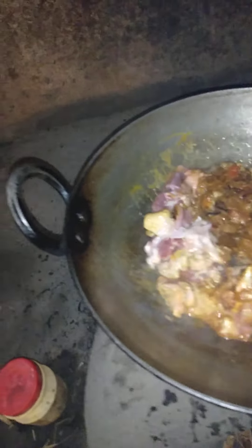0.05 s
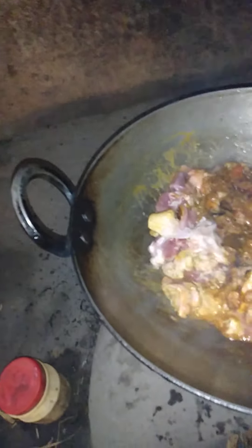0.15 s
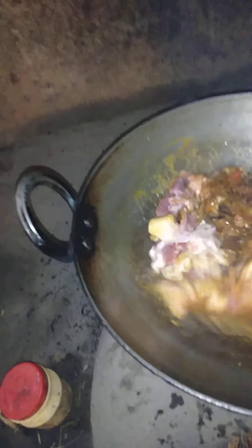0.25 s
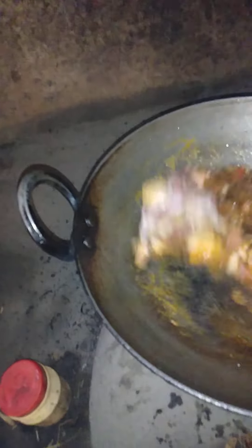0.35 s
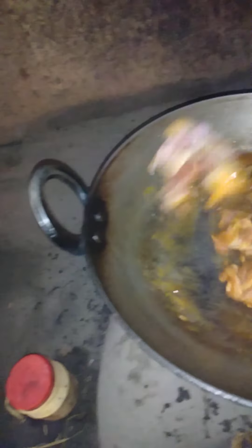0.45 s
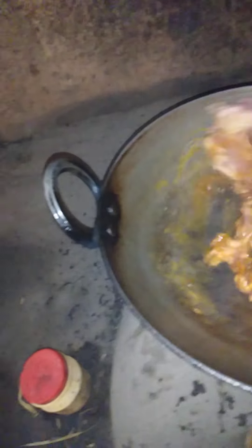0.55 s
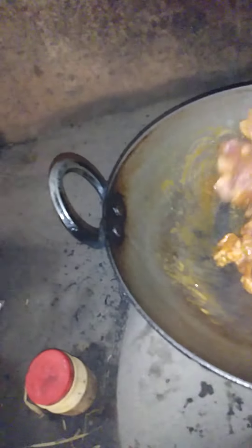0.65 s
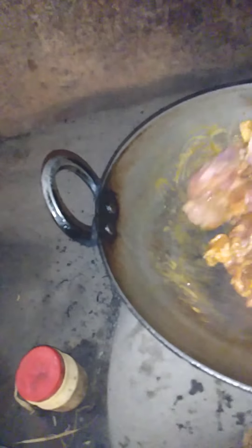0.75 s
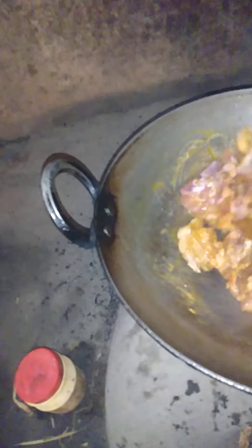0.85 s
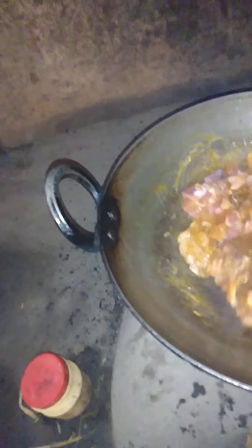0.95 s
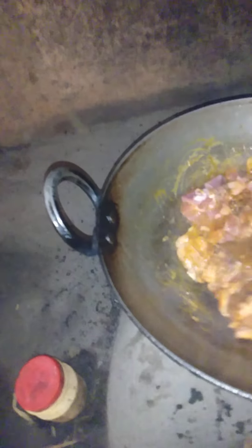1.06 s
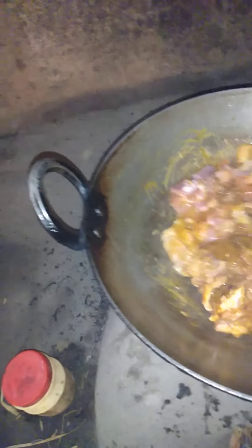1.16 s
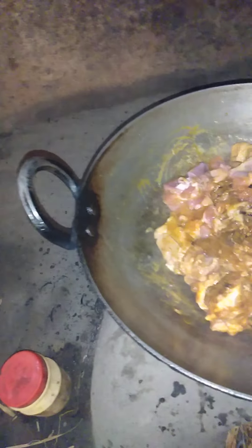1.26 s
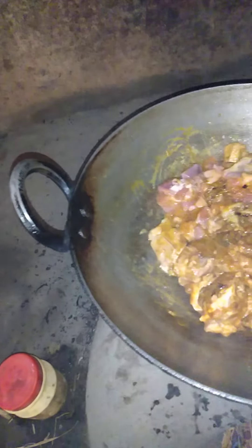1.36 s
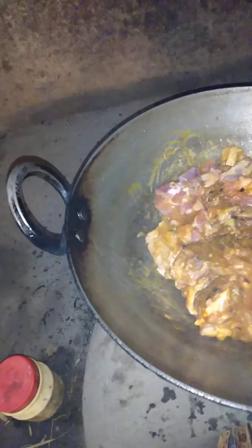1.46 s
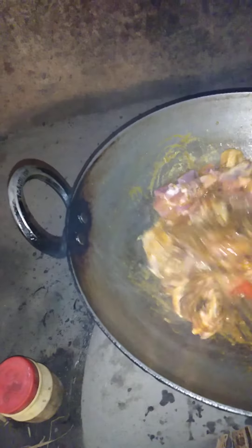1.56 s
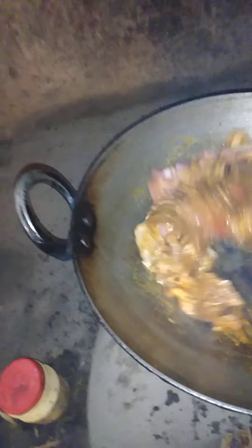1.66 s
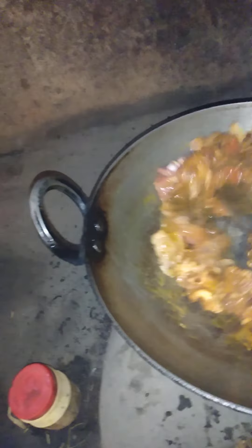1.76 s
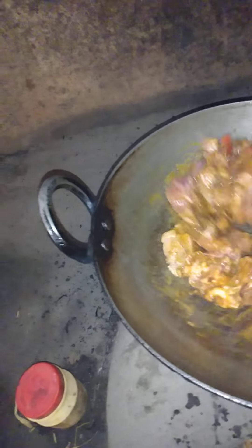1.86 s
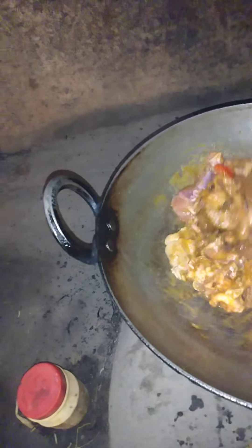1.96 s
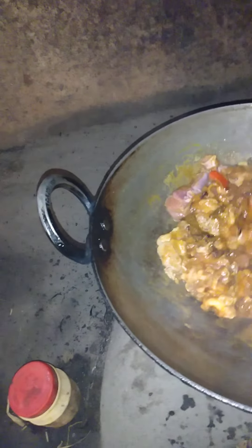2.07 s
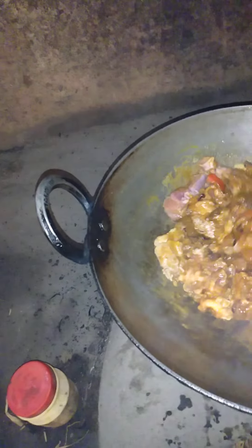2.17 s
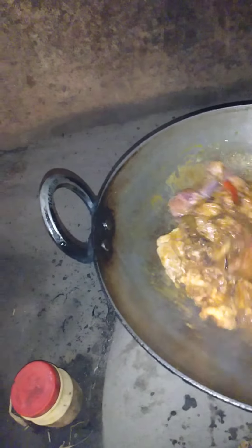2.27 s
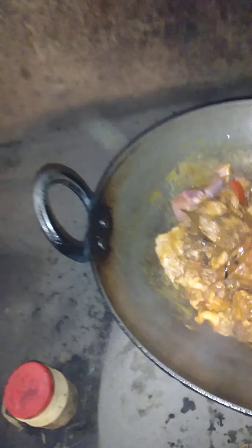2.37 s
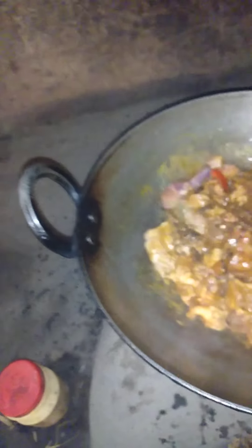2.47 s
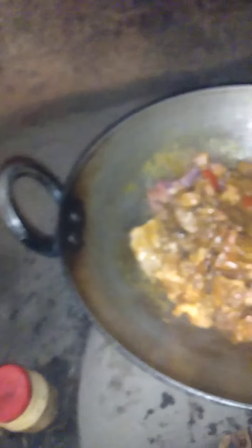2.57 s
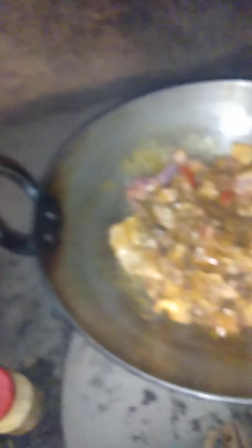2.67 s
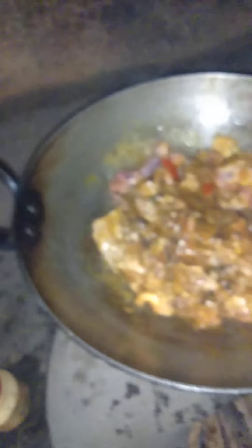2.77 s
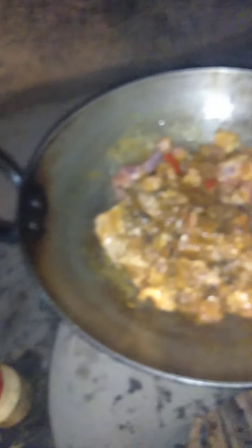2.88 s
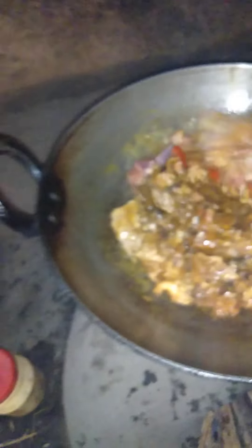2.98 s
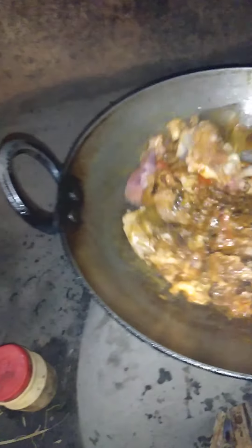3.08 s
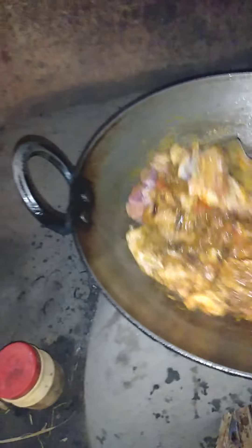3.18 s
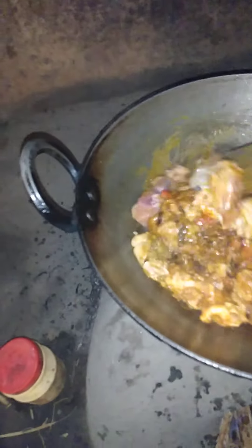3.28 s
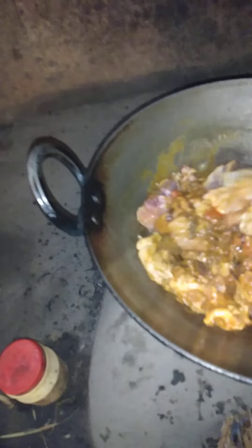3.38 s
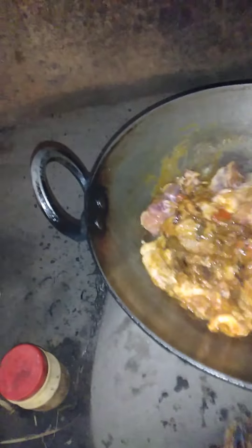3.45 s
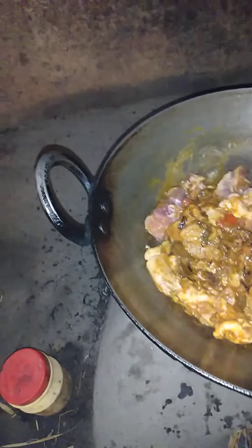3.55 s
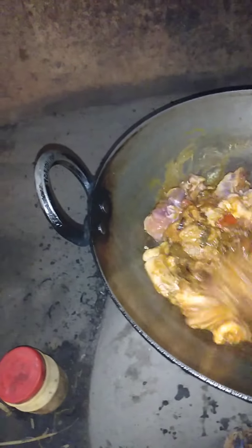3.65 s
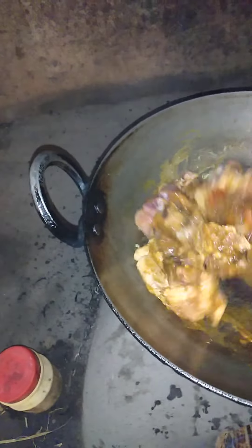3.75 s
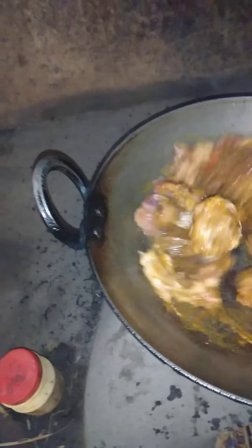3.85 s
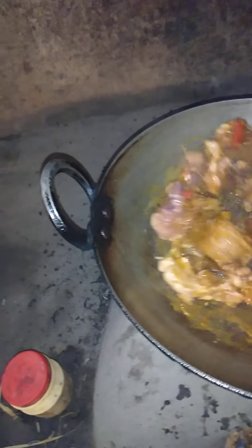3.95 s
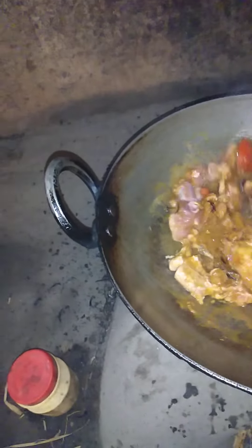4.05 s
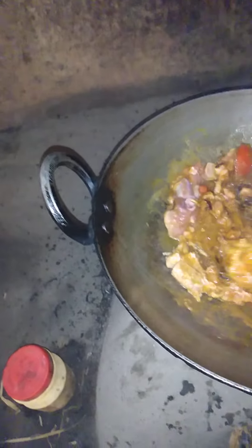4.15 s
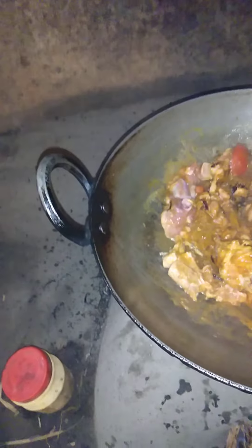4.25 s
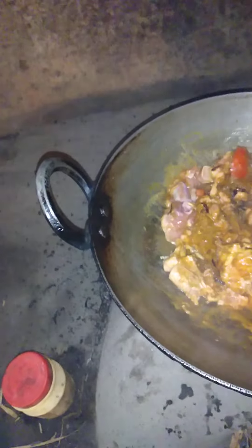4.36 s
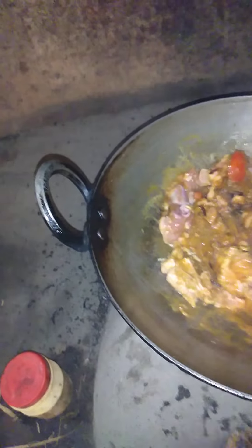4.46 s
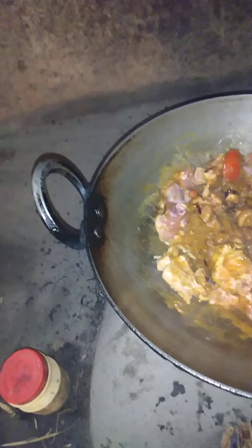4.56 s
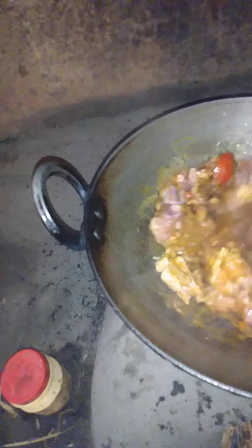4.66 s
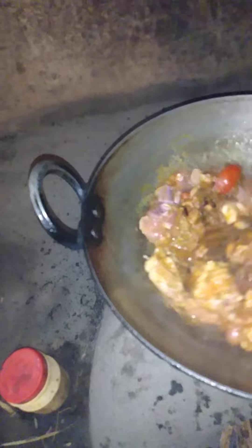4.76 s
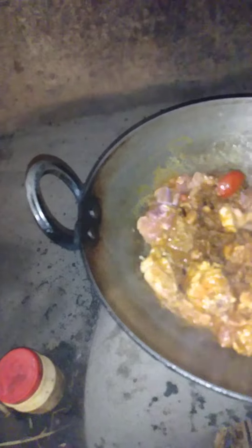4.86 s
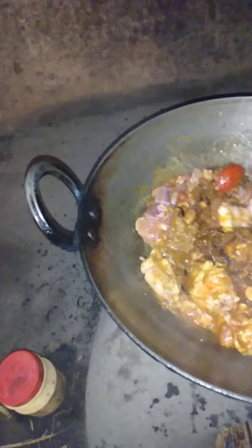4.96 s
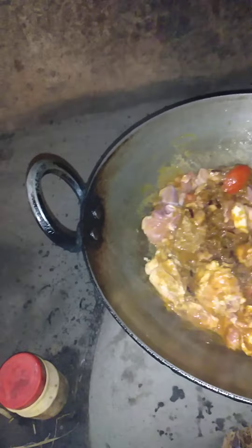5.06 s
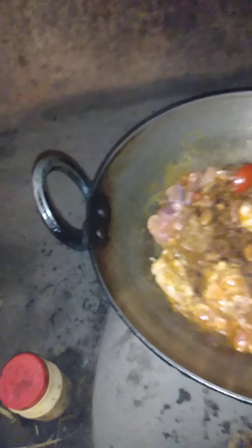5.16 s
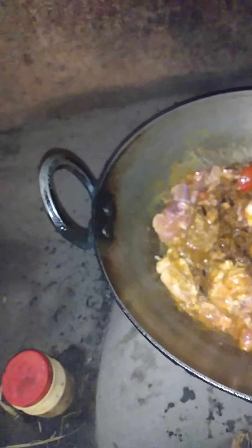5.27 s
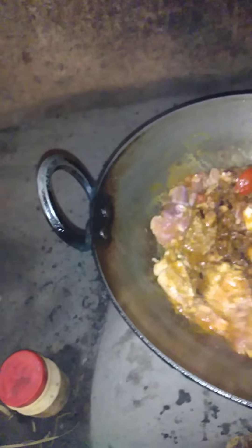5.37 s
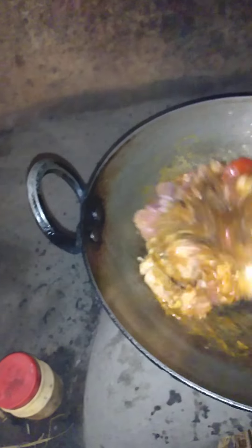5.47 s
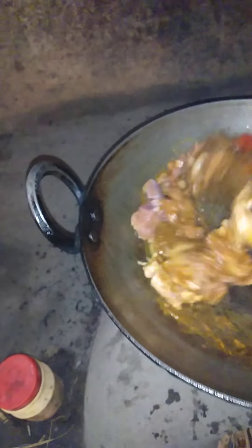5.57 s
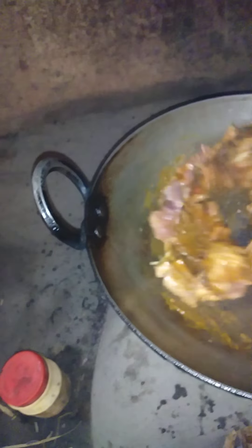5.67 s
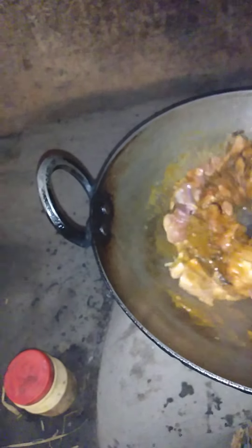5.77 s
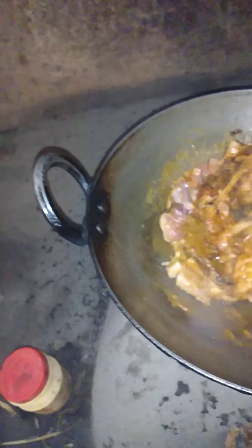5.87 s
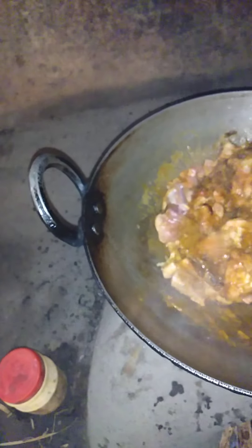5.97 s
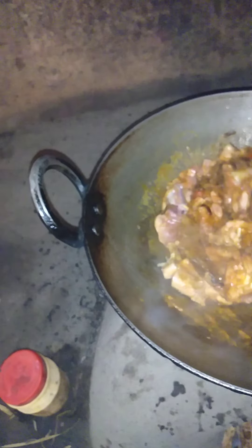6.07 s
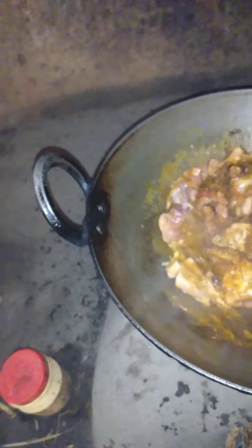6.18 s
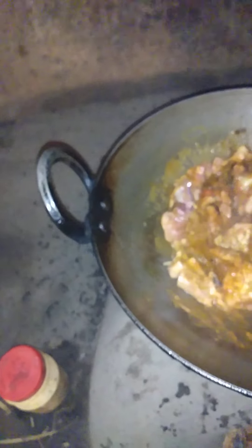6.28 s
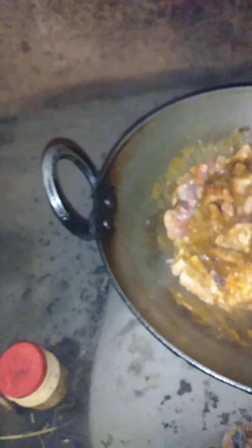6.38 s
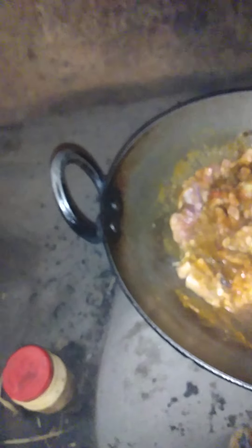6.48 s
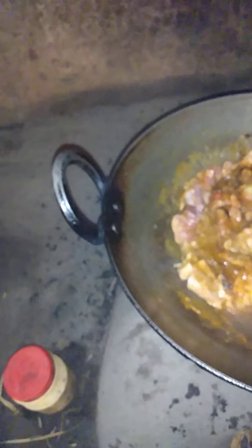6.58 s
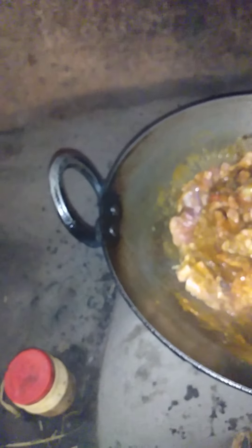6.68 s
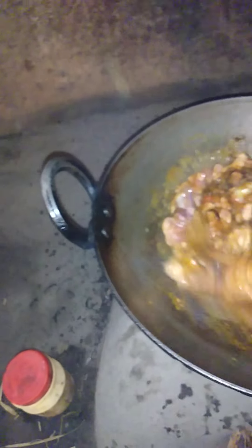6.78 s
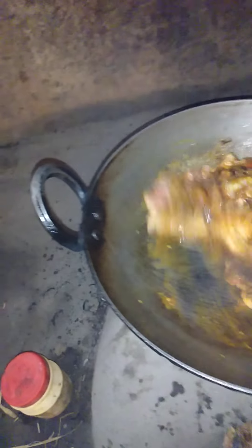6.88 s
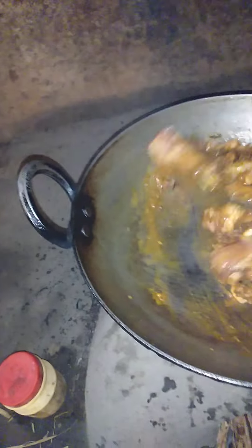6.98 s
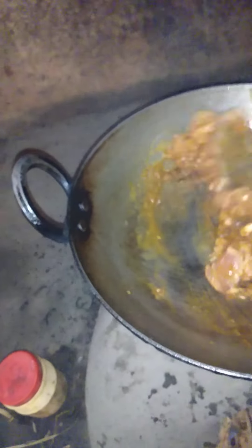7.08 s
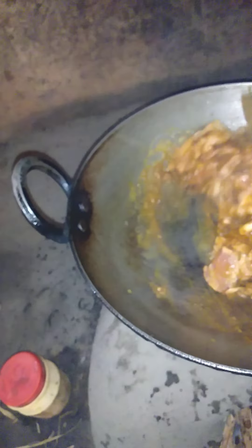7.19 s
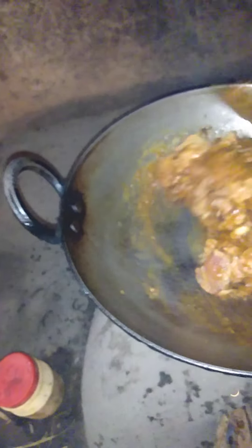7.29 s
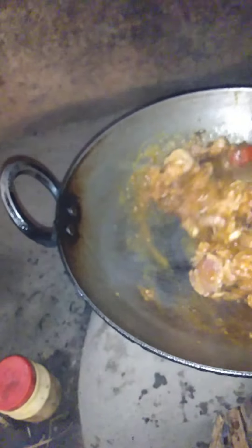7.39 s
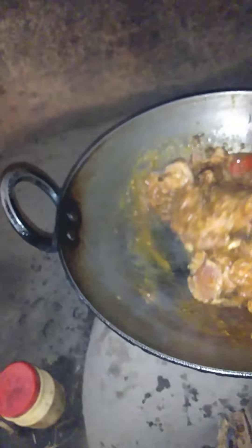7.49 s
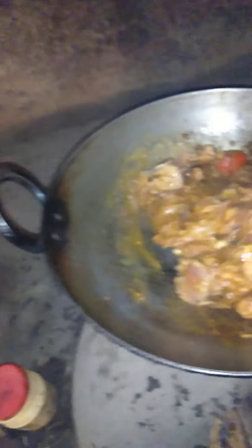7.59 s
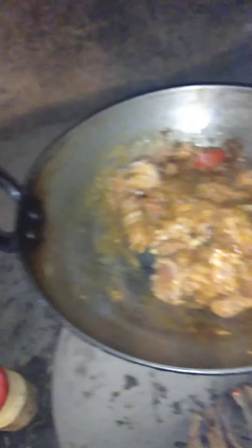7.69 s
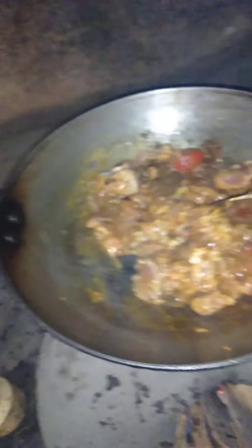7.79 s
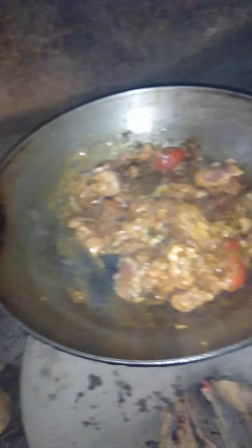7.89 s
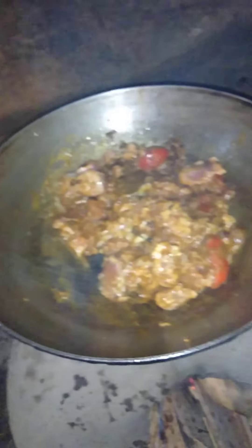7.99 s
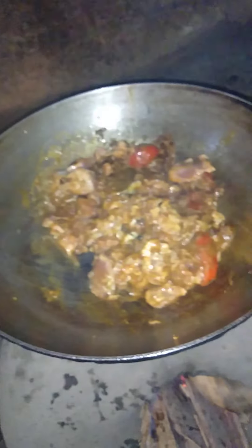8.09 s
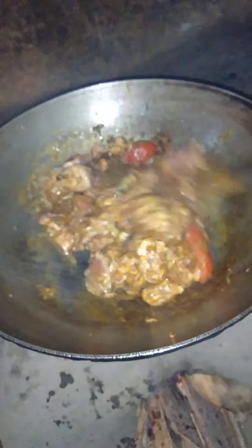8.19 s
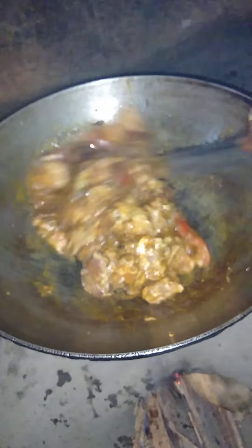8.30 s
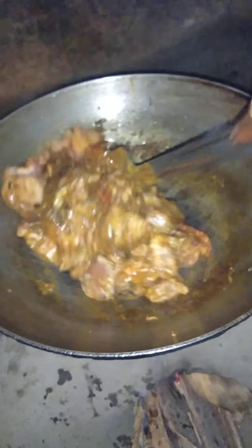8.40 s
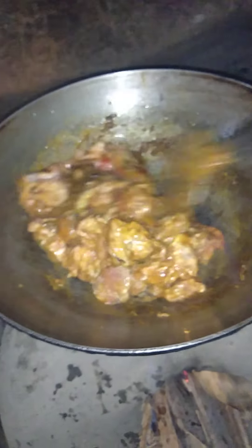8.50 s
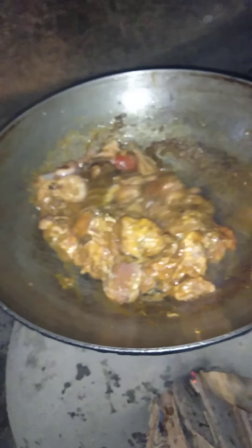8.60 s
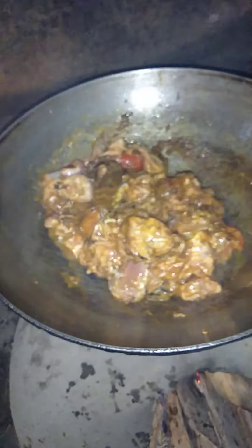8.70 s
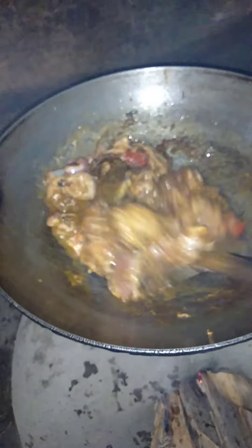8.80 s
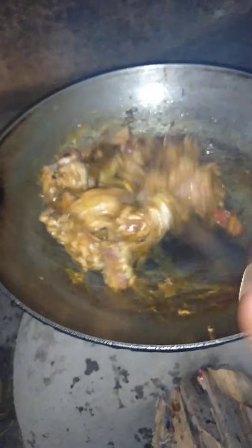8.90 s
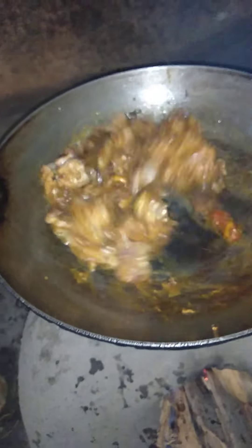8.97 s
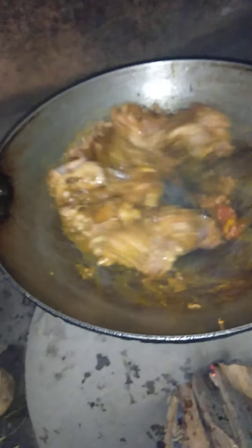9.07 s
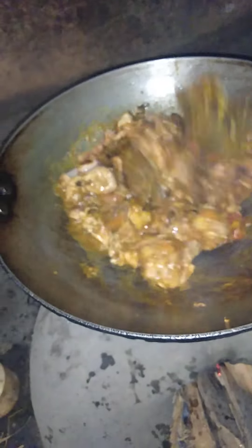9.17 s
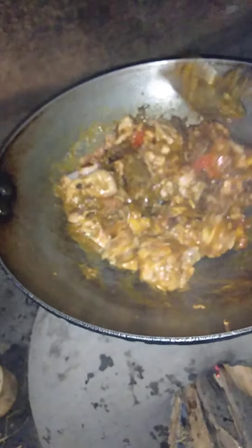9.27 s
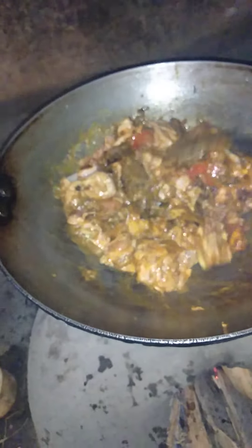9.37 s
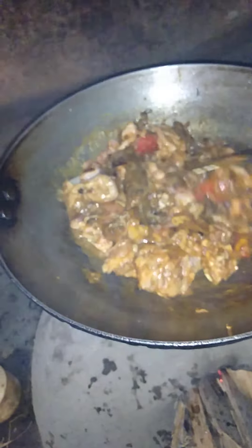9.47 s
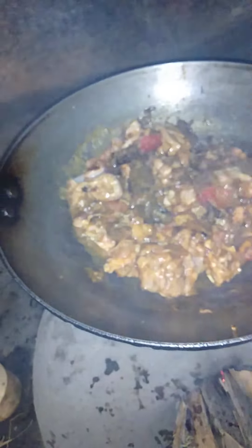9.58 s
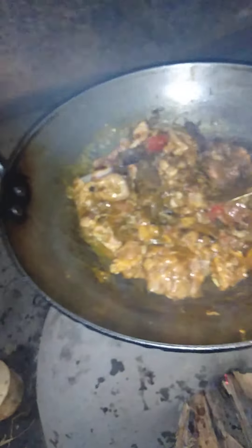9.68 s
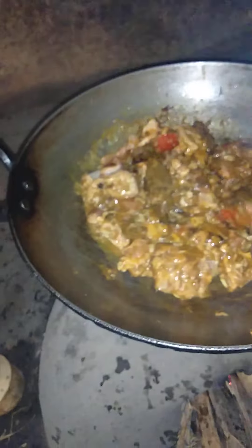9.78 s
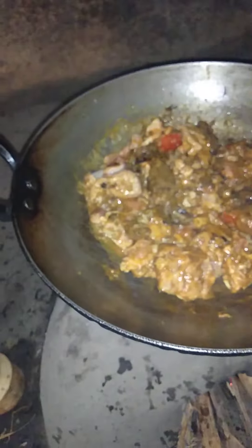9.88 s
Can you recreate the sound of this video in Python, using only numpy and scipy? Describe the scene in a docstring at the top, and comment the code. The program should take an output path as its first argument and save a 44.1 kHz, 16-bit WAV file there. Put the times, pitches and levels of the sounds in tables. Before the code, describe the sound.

Nearby, dry-sounding mono pickup of stir-frying: short gritty scrapes of a metal blade on a heavy iron pan, framed by bright knocks, some dulled by meat. An early stroke is followed by a longer spell of narrow, wavering sizzle with pops and spitting fat; later strokes are spaced out, with the sizzle dropping very low after six seconds. The last second brings a flurry of tiny taps and renewed simmering.

```python
"""Steel spatula in an iron pan of meat

Blade strikes, chatters and scrapes: shaped noise and stick-slip catches ring the pan's modes; light taps ring the blade's.
Wet meat pops (noise bursts around a pitch), fat spits (bright fading noise) and simmers (a narrow sizzle near 2 kHz
with wandering noise whistles). A small kitchen answers the strikes, scrapes, taps, pops and spits;
under it all, faint air and a low hum.
"""
import sys
import numpy as np
from scipy import signal
from scipy.fft import rfft, irfft, next_fast_len
from scipy.io import wavfile
from scipy.ndimage import uniform_filter1d, map_coordinates

SR = 44100
rng = np.random.default_rng(int(sys.argv[2]) if len(sys.argv) > 2 else 0)


def materialize(psi):
    """Save the field psi as 16-bit PCM at rate SR to the path in sys.argv[1].

    A 1-D psi becomes a single channel; in a 2-D psi each row is a channel.
    """
    bounded = np.clip(np.atleast_2d(psi).T, -1, 1)
    quanta = np.round(bounded * 32767).astype(np.int16)
    wavfile.write(sys.argv[1], SR, quanta)


N = 438354

# blade on pan, relative levels: start_s, level_db, cushion_0_to_1, chatter_s
BLADE_STRIKES = [(.226,-31.5,0.9,0.024), (.288,-25.5,0.27,0.0033), (0.358,-31,.15,0.0025),
                 (2.884,-27,0.11,0.015), (2.99,-44,0.01,0.0018), (3.048,-36,.3,0.0045),
                 (3.129,-38,0.2,.003), (3.173,-24,0.6,0.02), (3.632,-28.5,0,.016), (3.652,-30,0.07,0.0053),
                 (3.709,-34.5,.15,0.018), (3.751,-32,.4,0.0022), (3.805,-40,.05,0.0044),
                 (4.691,-25,0.53,0.0099), (4.728,-50.5,0.9,.008), (4.875,-50.5,.2,0.0053),
                 (4.981,-42.5,1,0.0015), (5.362,-27.5,0.09,.012), (5.388,-30.5,0.2,0.0045),
                 (5.477,-35.5,.15,.006), (5.511,-36,0.1,0.004), (5.549,-38,0.3,.004),
                 (6.761,-28.5,0.02,.016), (6.876,-36,.08,0.0076), (6.929,-37.5,0.2,0.0014),
                 (7.488,-40,0.31,0.0045), (7.783,-26.5,0.6,0.0035), (8.129,-28,0,.01),
                 (8.217,-43.5,0,0.0055), (8.796,-35,.25,0.0053), (8.807,-25.5,0.06,0.0027),
                 (8.873,-35,0,0.009), (8.914,-36,0.2,0.00395), (8.928,-35.5,0.1,0.0073),
                 (8.975,-35,.3,0.0033), (9.044,-41.5,0.4,.003), (9.137,-39.5,0.53,0.0096)]
# colour of a blow, from edge on bare iron over flat blade in sauce to meat alone:
# cushion_0_to_1, boom_db, thud_db, knock_db, clank_db, clash_db, sparkle_db
CUSHION_COLOUR = [(0, -22, -7, -11.5, -1.5, 2.5, 5.5), (.5, -34.5, -6.5, 0, .5, -3, -15.5),
                  (0.998, -17.5, 4.5, -4, -5, -30.5, -27)]


def strikes(settle_t60_s=0.28, settle_db=-10, rise_per_chatter=0.093, bounce_hz=280):
    """The blade bounces on the iron for some milliseconds, then settles in small catches; meat under it dulls the clash."""
    heavy_db, thud_db_per_db = -28, 0.86  # a blow this heavy moves the whole pan; thud growth with strength
    out, t = np.zeros(N), np.arange(SR // 4) / SR
    edges_hz = [(62, 145), (170, 550), (550, 1400), (1400, 3000), (3400, 6000), (6000, 17000)]
    cushions, *colours = np.transpose(CUSHION_COLOUR)
    for start_s, strength_db, cushion, chatter_s in BLADE_STRIKES:
        levels_db = [strength_db + np.interp(cushion, cushions, colour) for colour in colours]
        levels_db[1] += thud_db_per_db * (strength_db - heavy_db) * (1 - cushion)
        after_s = np.maximum(t - chatter_s, 0)
        cycle = np.cumsum(bounce_hz * amp(2.5 * wobble(200)[:len(t)])) / SR % 1
        bounces = unit(amp(-14 * cycle)) * amp(-60 * after_s / 0.018)
        catches = unit(amp(4 * wobble(220)[:len(t)])) * amp(settle_db - 60 * after_s / settle_t60_s)
        contact = bounces + catches * min(chatter_s / 0.0079, 1)
        onset = np.minimum(t / (rise_per_chatter * chatter_s), 1)
        force = contact * onset * rng.standard_normal(len(t))
        blow = pan(force, direct=0.17, vary_db=2.5)
        for level_db, edge_hz in zip(levels_db, edges_hz):
            add(out, start_s, amp(level_db) * spread(band(blow, *edge_hz), chatter_s + 0.0093))
    return out


# modes of the iron pan, relative levels: pitch_hz, width_hz, level_db
PAN_MODES = [(211,12,3), (300,40,-5), (405,65,-2), (619,20,-12), (826,22,0), (1040,40,-8), (1260,55,-7),
             (1945,80,-6), (2265,120,0), (2750,60,-7), (3580,80,-2), (3980,220,-5), (4550,150,-3),
             (4865,45,-2), (5525,55,-2), (5955,40,-2.5), (6560,66,-5), (7170,40,-4), (7900,60,-5),
             (8520,75,-2), (8930,55,-1), (9470,260,-5), (10000,130,0)]
# colour of steel on iron: frequency_hz, gain_db
STEEL_COLOUR = [(100, -6), (200, -4), (400, -1.5), (1000, 2), (5000, -2), (10300, -2), (12000, -5.5),
                (16000, -18.5)]


def pan(force, direct, vary_db):
    """The pan's modes ring on top of the direct contact; their strengths depend on the spot touched."""
    f = np.fft.rfftfreq(SR // 4, 1 / SR)
    modes = 0
    for pitch_hz, width_hz, level_db in PAN_MODES:
        resonance = 1j * f * width_hz / (pitch_hz ** 2 - f * f + 1j * f * width_hz)
        modes = modes + amp(level_db + vary_db * rng.standard_normal()) * resonance
    ringing = signal.fftconvolve(force, irfft(modes))[:len(force)]
    return filtered(direct * force + ringing, lambda f: amp(along(STEEL_COLOUR, f)))


# the blade's resonance, which shifts as meat loads and leaves it: time_s, pitch_hz
BLADE_RESONANCE = [(.55,1900), (3.06,2195), (3.13,3400), (3.175,2318), (3.78,2002), (3.93,2300),
                   (4.75,2111), (5.45,2068), (5.581,1000), (6.849,2300), (7.04,1399), (8.25,2245),
                   (8.41,600), (8.92,2263), (9.081,1076)]


def scrapes():
    """Each push drags the blade's edge over the iron; its rasp follows a gliding resonance."""
    rumble_gain, rasp_gain, grit_gain = pushes()
    resonance_hz = np.interp(np.arange(N) / SR, *np.transpose(BLADE_RESONANCE))
    judder = amp(1.6 * wobble(130))
    iron = pan(friction(slips_per_s=2400, size_db=1.8, hiss=.35) * judder, direct=0.45, vary_db=1)
    # the load of meat slowly shifts the resonances; the travelling contact point wakes different ones
    iron = map_coordinates(iron, [np.arange(N) + SR * .006 * wobble(2)], order=3)
    iron = patchy(iron, depth_db=5, frames=6)
    drag = amp(2.5 * wobble(90))
    rumble = unit(band(iron, 310, 1300) * drag)
    grit = unit(filtered(band(iron, 4100, 24000), lambda f: amp(along([(6000, -2.0), (10000, -8.0)], f))))
    squeal = unit(judder * whistle(resonance_hz, width_hz=260))
    rasp = unit(band(iron, 1100, 4700)) + amp(-6) * squeal
    return amp(-1.0) * rumble_gain * rumble + amp(-1) * rasp_gain * rasp + amp(-3.0) * grit_gain * grit


# slides, relative levels: start_s, length_s, rasp_db, rumble_db, grit_db, easing_db_per_s
BLADE_STROKES = [(0.277,.27,-34,-46.5,-37.5,14), (2.899,0.27,-32.5,-49.5,-32.5,-20),
                 (3.626,.3,-36.5,-44,-38,13), (4.708,0.19,-49,-68,-53,2.5), (5.357,.27,-33,-42,-35.5,28.5),
                 (6.762,0.27,-37,-51.5,-36,13.5), (7.479,0.064,-48,-101,-72,84),
                 (8.122,0.3,-41,-52.5,-40.5,-31), (8.801,0.28,-31,-43,-37.5,38)]
LIFT_DB_PER_S = 325  # the blade leaves the iron


def pushes():
    """Every stroke lands, bites, digs under the meat and lifts: gains of rumble, rasp and grit."""
    land_s, bite_s = 0.0075, 0.12  # the edge is down; the rasp peaks
    bite_db, rasp_sag_db_per_s, grit_sag_db_per_s = 20, 4.5, 28  # rasp swells to the bite, then meat damps the edge
    dig_db, dig_power = 8, 0.83  # the rumble grows as meat piles on the blade
    gains, t = np.zeros((3, N)), np.arange(SR // 2) / SR
    for start_s, length_s, rasp_db, rumble_db, grit_db, easing_db_per_s in BLADE_STROKES:
        travel, past_bite_s = np.minimum(t / length_s, 1), t - bite_s
        lift_db = LIFT_DB_PER_S * np.maximum(t - length_s, 0)
        press = np.minimum(t / land_s, 1) * amp(-easing_db_per_s * past_bite_s - lift_db)
        rumble = rumble_db + dig_db * travel ** dig_power
        rasp = rasp_db + np.minimum(bite_db * past_bite_s / bite_s, -rasp_sag_db_per_s * past_bite_s)
        grit = grit_db - grit_sag_db_per_s * past_bite_s
        for gain, db in zip(gains, (rumble, rasp, grit)):
            add(gain, start_s, press * amp(db))
    return gains


def friction(slips_per_s, size_db, hiss):
    """Stick and slip: a hail of tiny uneven catches over a fine hiss."""
    sizes = rng.standard_normal(N) * amp(size_db * rng.standard_normal(N))
    slips = (rng.random(N) < slips_per_s / SR) * sizes
    return unit(slips) + hiss * rng.standard_normal(N)


# light touches and squeaks, relative levels: start_s, low_modes_db, upper_modes_db, length_s
BLADE_TAPS = [(0.952,-62,-56,0.004), (1.07,-62,-64,0.026), (1.151,-55,-53.5,0.054), (1.537,-47,-58.5,0.046),
              (1.733,-67,-55.5,0.037), (8.65,-65,-56.5,0.0027), (8.696,-65.5,-68,0.0096),
              (9.264,-58,-67,0.023), (9.3,-59,-60.5,0.02), (9.332,-57.5,-55,0.013), (9.411,-83,-64,0.044),
              (9.478,-51,-57.5,0.013), (9.56,-48.5,-55.5,0.016), (9.602,-51,-56.5,0.018),
              (9.642,-60,-65,0.025), (9.691,-55,-61.5,.01), (9.745,-52,-65,0.0048),
              (9.759,-55.5,-64.5,0.011), (9.807,-49.5,-61,0.0092), (9.822,-51.5,-59,0.0044),
              (9.857,-48.5,-70,0.0029), (9.906,-50.5,-70.5,.007)]
# modes of the spatula's blade, relative levels: pitch_hz, level_db
BLADE_MODES = [(1950,-9), (2310,6), (2920,1), (3300,-7), (3980,1), (4270,0), (5900,-14), (8100,-16),
               (9550,-7), (10150,-1), (11000,-14), (12400,-16)]


def taps(rub_db=-13, rub_t60_s=0.23, rise_s=0.0033):
    """A graze swells and rubs on in broken catches, shaking the blade's damped modes at new strengths each time."""
    out, t = np.zeros(N), np.arange(SR // 6) / SR
    pitch_hz, mode_db = np.transpose(BLADE_MODES)
    low = pitch_hz < 2600
    decay = amp(-60 * t / .075) * np.minimum(t / .001, 1)
    for start_s, low_db, upper_db, length_s in BLADE_TAPS:
        touch = amp(-60 * np.maximum(t - length_s, 0) / 0.0091)
        rub = amp(rub_db - 60 * t / rub_t60_s + 6.8 * wobble(120)[:len(t)])
        graze = rng.standard_normal(len(t)) * np.minimum(t / rise_s, 1) * (touch + rub)
        bent_hz = pitch_hz * (1 + 0.018 * rng.standard_normal(len(pitch_hz)))
        strength = amp(mode_db + 4 * rng.standard_normal(len(pitch_hz)))
        modes = strength[:, None] * np.sin(2 * np.pi * bent_hz[:, None] * t) * decay
        for group, level_db in ((low, low_db), (~low, upper_db)):
            ringing = signal.fftconvolve(graze, modes[group].sum(0))[:len(t)]
            add(out, start_s, amp(level_db) * spread(ringing, length_s + 0.0022))
    return out


# wet pops and squelches of meat and fat, relative levels: start_s, pitch_hz, level_db, length_s
WET_POPS = [(0.204,314,-34,0.056), (.559,1830,-35,0.0039), (0.668,1147,-44,0.026), (.669,2730,-40.5,0.0086),
            (1.058,985,-62.5,0.11), (1.527,2020,-45,0.068), (1.538,864,-56,0.044), (1.723,767,-50,0.036),
            (1.734,1350,-48.5,0.049), (1.736,319,-53,0.047), (2.326,856,-64,.15), (2.333,2300,-46.5,0.0043),
            (2.344,3020,-55.5,.004), (2.473,2120,-53,0.036), (4.24,2180,-52.5,0.036),
            (4.814,2010,-40.5,0.0023), (4.967,1470,-47,0.014), (4.984,2020,-45.5,0.022),
            (6.037,2150,-61.5,0.023), (6.157,1950,-54,0.039), (6.217,1950,-51,0.062),
            (6.361,1010,-45,0.0082), (6.362,1300,-51,0.0025), (6.558,2230,-65.5,.01), (7.035,418,-49,0.029),
            (7.175,2310,-60,0.0092), (7.438,2160,-67.5,.02), (7.534,3400,-56,.004), (7.741,1140,-63,0.025),
            (8.382,548,-43,0.023), (8.518,2430,-63.5,0.079), (9.23,1720,-40.5,0.0043),
            (9.468,217,-57,0.037), (9.475,1605,-54.5,0.029), (9.526,1980,-39,0.00081)]


def pops(width_ratio=1.106, tail_db=-18, tail_t60_s=0.15):
    """Each pop is a short burst of tiny bubbles around one pitch."""
    out, t = np.zeros(N), np.arange(SR // 3) / SR
    for start_s, pitch_hz, level_db, length_s in WET_POPS:
        swell = np.minimum(t / (0.026 * length_s), 1)
        fade = amp(-60 * np.maximum(t - length_s, 0) / (length_s + 0.0069)) + amp(tail_db - 60 * t / tail_t60_s)
        bursts = rng.random(len(t)) < 500 / SR  # 500 per s
        bubbles = rng.standard_normal(len(t)) * (bursts + .06) * swell * fade
        ring = band(bubbles, pitch_hz / width_ratio - 30, pitch_hz * width_ratio + 30, order=3)
        snap = band(bubbles, pitch_hz / 1.6, pitch_hz * 1.6, order=4)
        add(out, start_s, amp(level_db) * spread(ring + amp(-28) * snap, length_s + 0.005))
    return out


# fat spitting on the hot iron, relative levels: start_s, level_db, length_s
FAT_SPITS = [(0.213,-46,0.0065), (0.229,-43,0.0077), (0.737,-54,0.0071), (1.172,-31.5,0.0033),
             (1.434,-53,0.022), (1.462,-46,0.02), (1.51,-53,0.07), (1.59,-41.5,0.0041), (3.436,-57.5,.005),
             (7.356,-57.5,0.0057)]
# colour of a spit: frequency_hz, gain_db
SPIT_COLOUR = [(1500,-44), (4000,-11.5), (6500,-2), (10000,9.5), (15000,-9.5)]


def spits(snap_t60_s=0.024, fizz_db=-17, fizz_t60_s=0.5):
    """A droplet bursts with a bright snap and fizzes away."""
    out, t = np.zeros(N), np.arange(SR // 4) / SR
    for start_s, level_db, length_s in FAT_SPITS:
        fade = amp(-60 * np.maximum(t - length_s, 0) / snap_t60_s) + amp(fizz_db - 60 * t / fizz_t60_s)
        fizz = patchy(rng.standard_normal(len(t)), depth_db=6.0, frames=12)
        burst = filtered(fizz, lambda f: amp(along(SPIT_COLOUR, f))) * fade * np.minimum(t / length_s, 1)
        add(out, start_s, amp(level_db) * spread(burst, length_s + 0.0037))
    return out


# simmering fat, relative level: time_s, level_db, pitch_hz
SIMMER_COURSE = [(0,-52,2250), (.65,-45.5,2400), (1.15,-45.5,2330), (1.401,-50,2230), (1.8,-45.5,2230),
                 (2.189,-58,2020), (2.299,-51.5,2230), (2.619,-54,2100), (3.301,-48.5,2230),
                 (3.55,-56.5,2070), (4.05,-52,2270), (4.351,-57,2130), (5.102,-51.5,2180), (5.78,-50,2200),
                 (5.899,-77,2150), (8.902,-91.5,2150), (9.217,-50,1950), (9.94,-77,2250)]
# colour of the narrow sizzle: frequency_hz, gain_db
SIZZLE_COLOUR = [(1500, -40.5), (1750, -15.5), (1900, 11.5), (2250, 4), (2450, 0), (2650, -29),
                 (3300, -35.5)]
# colour of wet bubbling: frequency_hz, gain_db
WET_COLOUR = [(300, -13), (560, -26.5), (720, 7.5), (850, -16.5), (1000, -18.5), (1350, -2.5), (1700, -9),
              (2700, 1), (3200, -10.5), (4200, -6.5), (6000, -39.5), (12000, -47)]


def simmer(lively_db=-45, growth=2.5, widening=1.5):
    """Sizzle in a narrow band near 2 kHz, with a few thin wandering noise whistles; wet bubbling widens it when louder."""
    time_s, *columns = np.transpose(SIMMER_COURSE)
    level_db, pitch_hz = (np.interp(np.arange(N) / SR, time_s, column) for column in columns)
    level_db = np.maximum(level_db, stirring())

    def bubbles(depth_db):
        """Slow-shifting random grains with a wobbling level."""
        grains = friction(slips_per_s=600, size_db=3, hiss=.6)
        return patchy(grains, depth_db, frames=9) * amp(1.5 * wobble(25))

    sizzle = unit(filtered(bubbles(4), lambda f: amp(along(SIZZLE_COLOUR, f))))
    whistles = [whistle(pitch_hz + 90 * wobble(14), width_hz=90) * amp(3.5 * wobble(22)) for _ in range(3)]
    core = unit(sum(whistles))
    froth = whistle(pitch_hz + 330, width_hz=260) * amp(2 * wobble(30))
    wet = unit(filtered(bubbles(7), lambda f: amp(along(WET_COLOUR, f))))
    hiss = unit(band(bubbles(3), 2300, 12000, order=5))
    # these gains change faster than the level itself and match it at lively_db
    busy = amp(lively_db + widening * (level_db - lively_db))
    lively = amp(lively_db + growth * (level_db - lively_db))
    narrow = amp(-3.0) * busy * sizzle + amp(level_db - 4.5) * core
    return narrow + lively * (amp(-10.5) * wet + amp(-6.5) * froth) + amp(level_db - 27) * hiss


def stirring(stir_db=-56, calm_db_per_s=78.5):
    """Level in dB of fat flaring where a stroke has bared hot iron, then calming; more after a hard stroke."""
    t = np.arange(N) / SR
    hardest_db = max(row[2] for row in BLADE_STROKES)
    flares_db = []
    for start_s, length_s, rasp_db, *_ in BLADE_STROKES:
        past_end_s = t - start_s - length_s
        drop_db = np.maximum(calm_db_per_s * past_end_s, -LIFT_DB_PER_S * past_end_s)
        flares_db.append(stir_db + rasp_db - hardest_db - drop_db)
    return np.max(flares_db, axis=0)


# decay of the kitchen's answer: frequency_hz, t60_s
KITCHEN_DECAY = [(150, 0.12), (400, .3), (1500, 0.18), (7000, 0.18), (15000, 0.016)]


def kitchen(x):
    """Close walls: each frequency of their answer dies at its own speed."""
    hz, t, z = signal.stft(rng.standard_normal(SR // 2), SR, nperseg=256)
    tail = signal.istft(z * amp(-60 * t / along(KITCHEN_DECAY, hz)[:, None]), SR, nperseg=256)[1]
    tail = np.pad(tail, (round(.004 * SR), 0))  # 4 ms delay
    return signal.fftconvolve(x, tail / np.linalg.norm(tail))[:N]


# colour of the air: frequency_hz, gain_db
AIR_COLOUR = [(20, -2.5), (70, -3), (190, -15.5), (1000, -20), (2000, -18), (6000, -26.5), (10000, -22),
              (13000, -38)]
# relative level of the low hum: time_s, level_db
HUM_LEVEL = [(0, -5.5), (1.8, -3.5), (2.6, -11.5), (5.3, -12), (5.9, -31.5)]


def background():
    """Faint air, and a low hum that fades after the first seconds; the air then sinks too and flutters."""
    air = unit(filtered(rng.standard_normal(N), lambda f: amp(along(AIR_COLOUR, f))))
    hum = unit(filtered(rng.standard_normal(N), lambda f: np.exp(-((f - 64) / 5) ** 2)))
    fade_db = np.interp(np.arange(N) / SR, *np.transpose(HUM_LEVEL))
    flutter_db = .07 * fade_db * wobble(14)
    return amp(-67.0 + 0.26 * fade_db + flutter_db) * air + amp(-66.5 + fade_db) * hum


def whistle(hz, width_hz):
    """A narrow band of noise riding on a moving centre frequency."""
    wander = band(rng.standard_normal(N), 40, width_hz)
    return unit(wander * np.cos(2 * np.pi * np.cumsum(hz) / SR))


def patchy(x, depth_db, frames):
    """Let the colour shift: random gains in narrow bands, smoothed over so many frames."""
    z = signal.stft(x, nperseg=512)[2]
    field = uniform_filter1d(rng.standard_normal(z.shape), size=2, axis=0)
    field = uniform_filter1d(field, size=frames, axis=1)
    return signal.istft(z * amp(depth_db * unit(field)), nperseg=512)[1][:len(x)]


def amp(db):
    """Decibels to gain."""
    return 10 ** (np.asarray(db) / 20)


def unit(x):
    """Scale to rms 1."""
    return x / np.sqrt(np.mean(x ** 2) + 1e-20)


def along(points, hz):
    """Interpolate (Hz, value) points on a log axis."""
    f, v = np.transpose(points)
    return np.interp(np.log(hz + 1), np.log(f + 1), v)


def wobble(knots_per_s):
    """A smooth random curve shaped by normal-distributed knots."""
    knots = rng.standard_normal(int(N * knots_per_s / SR) + 4)
    return map_coordinates(knots, [np.arange(N) * knots_per_s / SR], order=2)


def filtered(x, response):
    """x times a response of frequency."""
    m = next_fast_len(len(x) + 8192)
    return irfft(rfft(x, m) * response(np.fft.rfftfreq(m, 1 / SR)), m)[:len(x)]


def band(x, lo_hz, hi_hz, order=3):
    """Causal band-pass."""
    sos = signal.butter(order, [lo_hz, min(hi_hz, .48 * SR)], "band", fs=SR, output="sos")
    return signal.sosfilt(sos, x)


def add(track, start_s, sound):
    """Mix a sound in at start_s."""
    part = track[max(round(start_s * SR), 0):][:len(sound)]
    part += sound[:len(part)]


def spread(x, seconds):
    """Scale x to the energy of rms 1 held for so many seconds."""
    return x * np.sqrt(seconds * SR / (np.sum(x ** 2) + 1e-20))


def scene():
    """Blade, food and room mixed to one channel."""
    blade = amp(.5) * strikes() + scrapes() + amp(4.0) * taps()
    food = amp(3.0) * pops() + amp(2.0) * spits()
    near = blade + food
    return (near + amp(-12) * kitchen(near) + simmer() + background())[None]


def record(dry, top_hz=15900):
    """Nothing passes from top_hz up."""
    return np.array([filtered(x, lambda hz: hz < top_hz) for x in dry])


dry = scene()
out = record(dry)
materialize(out)
```